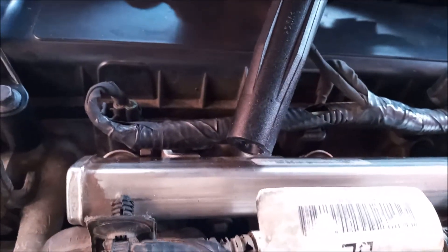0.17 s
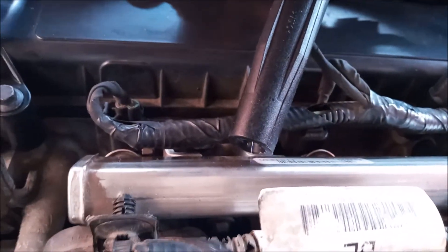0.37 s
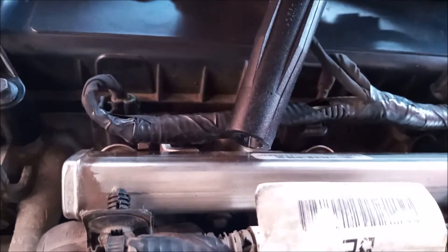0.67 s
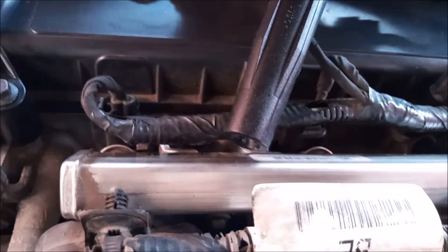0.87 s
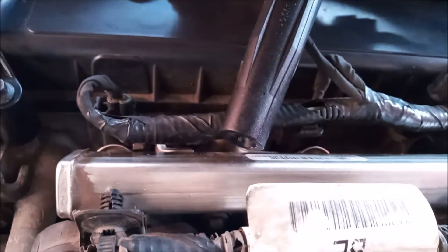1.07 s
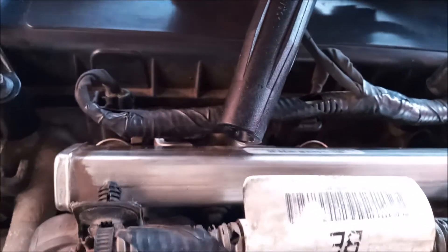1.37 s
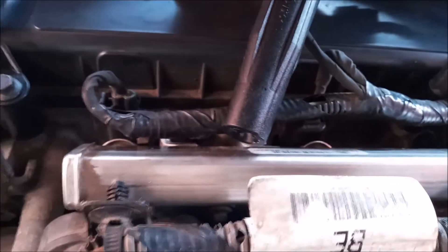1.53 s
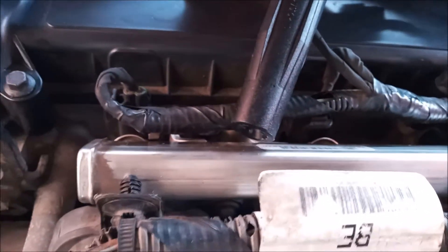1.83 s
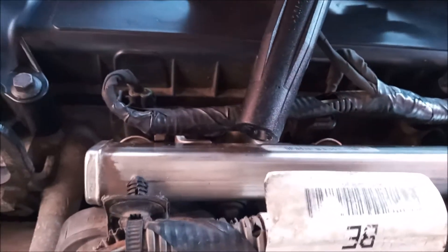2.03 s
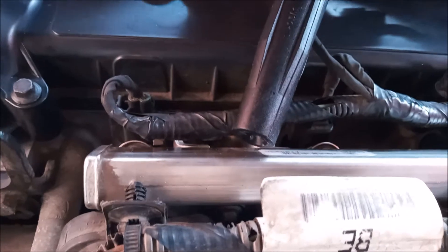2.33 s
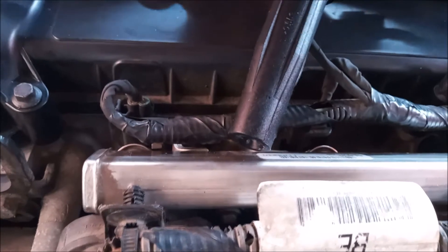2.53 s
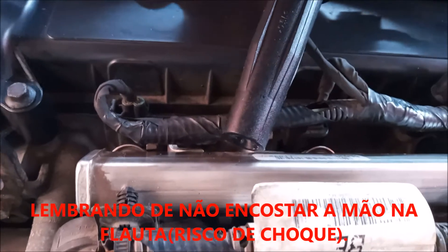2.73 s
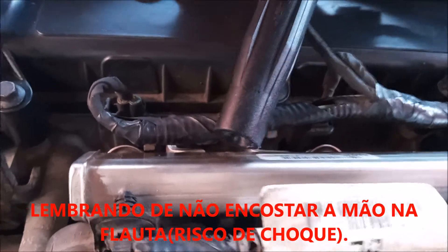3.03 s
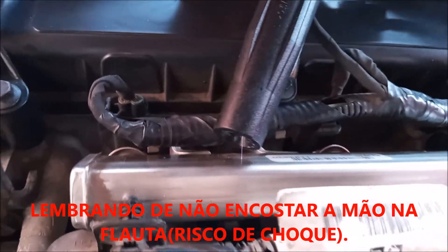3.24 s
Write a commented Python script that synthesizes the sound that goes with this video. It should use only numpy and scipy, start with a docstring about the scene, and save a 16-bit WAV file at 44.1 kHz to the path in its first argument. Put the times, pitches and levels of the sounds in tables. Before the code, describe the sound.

A loose ignition coil fires bright, dry snaps at an even fast pace throughout; between them the idling engine's noisy rush and valve clatter swell back in a close engine bay.

```python
"""An engine bay: a loose ignition coil fires one spark per engine cycle onto a metal rail, close to a small
microphone. Each spark is a noise sizzle, a decaying sine pop and ringing rail modes. Under it the engine idles:
shaped noise roar, sine whine and hums, block modes struck by clatter and valve knocks, and injector ticks.
A look-ahead limiter pulls everything down just before each spark and lets go after it."""
import sys
import numpy as np
from scipy import signal
from scipy.io import wavfile
from scipy.ndimage import uniform_filter1d, minimum_filter1d

SR = 44100
rng = np.random.default_rng(int(sys.argv[2]) if len(sys.argv) > 2 else 0)


def wrap_up_sound(samples):
    """Save the sound to the file named by the first command line argument, as 16-bit audio."""
    columns = np.atleast_2d(samples).T
    # keep every value between -1 and 1, then stretch to whole-number steps
    tamed = np.clip(columns, -1, 1)
    steps = np.round(tamed * 32767).astype(np.int16)
    wavfile.write(sys.argv[1], SR, steps)


N = 149940  # length in samples

# Spectrum of the engine, belt and fan roar. Each row: frequency in Hz, relative density in dB per Hz.
ROAR_SPECTRUM = [(24, -61), (40, -31), (553, -12.5), (747, -15), (1140, -11.5), (1620, -8.5), (1880, -9),
                 (3440, -3.5), (3800, -6.5), (4200, -4), (5670, -7.5), (6580, -11.5), (7280, -20.5),
                 (10900, -16), (15800, -20)]
# Alternator whine. Each row: multiple of WHINE_HZ, nominal rms level in dB.
WHINE_PARTIALS = [(1, -64), (2, -60), (3, -50.5), (3.5, -56), (4, -58), (8, -47)]
# Steady hums. Each row: frequency in Hz, nominal rms level in dB.
HUM_TONES = [(749, -51.5), (807.5, -49.5), (1212, -61.5)]
# Modes of the engine block. Each row: frequency in Hz, relative level in dB, t60 in seconds.
BLOCK_MODES = [(554.4, -11.5, 0.053), (804, -14.5, 0.062), (1580, -10, 0.038), (2490, -6, 0.045),
               (2773, -3.5, .04), (3034, -2.5, 0.036), (3384, 2, 0.018), (4108, 1.5, 0.038),
               (4515, -9.5, 0.063), (4890, -13.5, 0.017), (5108, -2.5, 0.052), (5765, -5, 0.065),
               (6390, -14, 0.047)]
# Valve knocks. Each row: delay after the spark in seconds, mean level in dB, spread in seconds.
VALVE_KNOCKS = [(.018, -40.5, 0.0067), (.042, -33.5, .003), (.055, -32, .005), (0.0917, -26.5, .0015),
                (.124, -27.5, .005)]
# Injectors. Each row: delay after the spark in seconds, click level before its high-pass in dB,
# mean lower ring level in dB, mean upper ring level in dB, rattle time in seconds.
INJECTOR_TICKS = [(.0380, -20.5, -37.5, -40, 0.0028), (.0790, -31, -41.5, -25.5, 0.0022),
                  (.1160, -19, -39, -34, 0.0049)]
# Lower and upper injector modes. Each row: frequency in Hz, relative level in dB, t60 in seconds.
LOW_MODES = [(10540, -1.5, 0.0091), (11040, -2, 0.014), (12000, 0, .015)]
HIGH_MODES = [(14800, -2, .015), (14950, 15, 0.013), (15610, 13, 0.018)]
# Sparks. Each row: start in seconds, then rail ring, pop and sizzle peak levels in dB before the limiter.
SPARK_EVENTS = [(0.0363, -2, -23, -4), (0.186, -2, -23.5, -7), (0.3371, -3, -21, -5),
                (0.4882, -2.5, -15, -5), (0.6386, -5, -20, -6), (0.7895, -1, -17, -2),
                (0.9387, -3.5, -25, -3), (1.0902, -2, -23, -4), (1.2411, -5.5, -19, -13),
                (1.3902, 0, -12, -6), (1.5411, -6.5, -10, -8.5), (1.6916, -2, -19, -7),
                (1.8421, -3.5, -22, -9), (1.9921, -0.5, -14, -8), (2.1428, -6, -16.5, -10),
                (2.2936, -4, -12, -10.5), (2.443, -0.5, -10, -5), (2.5944, -7.5, -12, -8),
                (2.7456, -1.5, -12, -6), (2.898, -1, -19.5, -7), (3.05, -5.5, -20.5, -11),
                (3.2018, -7.5, -15, -9.5), (3.3536, -2.5, -17, -5.5)]
# Modes coloring the sizzle, then modes of the rail. Each row: frequency in Hz, relative level in dB, t60 in seconds.
SIZZLE_MODES = [(10060, -7, .004), (12300, -4.5, 0.0061), (13560, -4.5, .005), (14800, -4, 0.0069),
                (15400, -6, 0.011)]
RAIL_MODES = [(2850, -5, 0.0065), (3940, -3.5, 0.0071), (4800, -1, 0.012), (5640, -3, 0.0068),
              (6410, -4.5, 0.0089), (7680, -7.5, 0.0072), (8220, -8, 0.0094)]
# Echoes off the engine bay. Each row: delay in seconds, level in dB re the direct sound.
BAY_ECHOES = [(.0007, 13.5), (.0018, -15.5), (.0034, -13), (.0060, -3)]
# Scattered tail of the engine bay. Its one row: t60 in seconds, initial level in dB re the direct sound.
BAY_TAIL = (0.034, -6.5)

CYCLE_S = .1507  # places the cycle that began before the first spark
ROAR_DB, PATCH_DB, FLICKER_DB = -28, 2, 2  # overall rms; rms of the two level variations
WHINE_HZ = 685.5
CLATTER_DB, CLATTER_PER_S, CLATTER_SPREAD_DB = -31.5, 2500, 1.5
KNOCK_VARY_DB, TICK_VARY_DB, JITTER_S = 4.5, 3, .0006  # standard deviations
SIZZLE_S = 0.00057  # rise and decay time of the sizzle noise
POP_HZ, POP_DECAY_S, POP_DELAY_S = 1000, 0.00041, 0.00078
RING_DELAY_S, CRACKLE_DECAY_S, CRACKLE = .0012, 0.00022, 0.4  # CRACKLE: noise added to a unit impulse
GAIN_DB, LIMIT_DB, DUCK_DB = 5, -16.5, 10  # make-up gain, threshold, greatest reduction
LOOK_S, HOLD_S, SMOOTH_S, RECOVER_S = 0.0044, 0.02, 0.021, 0.0069
ROLL_HZ, EDGE_HZ = 15800, 16800  # low-pass of the idling engine, band limit of the whole


def amp(db):
    """A level in decibels is the logarithm of an amplitude ratio."""
    return 10 ** (np.asarray(db) / 20)


def unit(x):
    """Division by the root mean square gives rms 1."""
    return x / np.sqrt(np.mean(x ** 2) + 1e-20)


def peaked(x):
    """Division by the greatest magnitude gives peak 1."""
    return x / abs(x).max()


def read(points, hz):
    """Interpolation of a spectrum along a logarithmic frequency axis."""
    f, value = np.transpose(points)
    return np.interp(np.log(hz + 1), np.log(f + 1), value)


def add(mix, s, sound):
    """Superposition: sounds add linearly; one that would start before time zero is left out."""
    i = round(s * SR)
    if i >= 0:
        part = mix[i:][:len(sound)]
        part += sound[:len(part)]


def ring(modes):
    """Modal superposition: an impulse response of decaying sines, scaled to energy 1."""
    t = np.arange(4096) / SR
    x = np.zeros(len(t))
    for k, (hz, db, t60) in enumerate(modes):
        decay = amp(db - 60 * t / t60) / np.sqrt(t60)
        x += (-1) ** k * decay * np.sin(2 * np.pi * hz * t)
    return x / np.linalg.norm(x)


def burst(noise, length_s):
    """A rattle as enveloped noise: quick rise, exponential fall, energy of 10 ms at rms 1."""
    u = np.arange(len(noise)) / SR / length_s
    x = noise * u * np.exp(-u)
    return x / np.linalg.norm(x) * np.sqrt(SR / 100)


def cycles():
    """Periodicity: spark times start the cycles, with one already under way at time zero."""
    return [SPARK_EVENTS[0][0] - CYCLE_S] + [row[0] for row in SPARK_EVENTS]


def roar():
    """Broadband engine, belt and fan noise: a shaped random spectrum with drifting patches and a shared flicker."""
    frames, hz = N // 128 + 5, np.fft.rfftfreq(512, 1 / SR)
    real, imaginary, patch = rng.standard_normal((frames, 257, 3)).T
    patch = uniform_filter1d(patch, size=8, axis=0)  # smooth over frequency
    patch = unit(uniform_filter1d(patch, size=10, axis=1))  # smooth over time
    flicker = unit(uniform_filter1d(rng.standard_normal(frames), size=3))
    level_db = read(ROAR_SPECTRUM, hz)[:, None] + PATCH_DB * patch + FLICKER_DB * flicker
    spectrum = (real + 1j * imaginary) * amp(level_db)
    noise = signal.istft(spectrum, nperseg=512, noverlap=384)[1][:N]
    return amp(ROAR_DB) * unit(noise)


def tones():
    """Alternator whine and steady hums: sines with slight amplitude and phase modulation."""
    t, out = np.arange(N) / SR, np.zeros(N)
    whine = [(multiple * WHINE_HZ, db) for multiple, db in WHINE_PARTIALS]
    for hz, db in whine + HUM_TONES:
        waver = unit(uniform_filter1d(rng.standard_normal(N), size=4000))
        level = amp(db + 3.0 * waver) * np.sqrt(2)  # 3 dB rms waver
        phase = 2 * np.pi * hz * (t + .00008 * waver) + 6 * rng.random()
        out += level * np.sin(phase)
    return out


def block():
    """Modal excitation: dense small taps and timed valve knocks ring the engine block."""
    size_db = CLATTER_SPREAD_DB * np.minimum(rng.exponential(1, N), 5)
    taps = amp(size_db) * rng.choice([-1, 1], N) * (rng.random(N) < CLATTER_PER_S / SR)
    drive = amp(CLATTER_DB) * unit(taps)
    for start in cycles():
        for delay, db, spread_s in VALVE_KNOCKS:
            noise, vary = rng.standard_normal(1500), rng.standard_normal(2)
            s = start + delay - spread_s + JITTER_S * vary[0]  # the envelope crests near the delay
            add(drive, s, amp(db + KNOCK_VARY_DB * vary[1]) * burst(noise, spread_s))
    return signal.oaconvolve(drive, ring(BLOCK_MODES))[:N]


def injectors():
    """Impact and resonance: each injector clicks at its place in the cycle and rattles two groups of modes."""
    click, low, high = np.zeros((3, N))
    for start in cycles():
        for delay, click_db, low_db, high_db, rattle_s in INJECTOR_TICKS:
            noise, vary = rng.standard_normal((3, 1000)), rng.standard_normal(3)
            s = start + delay + JITTER_S * vary[0]
            add(click, s, amp(click_db) * noise[0, :100] * np.exp(-np.arange(100) / 25))
            add(low, s, amp(low_db + TICK_VARY_DB * vary[1]) * burst(noise[1], rattle_s))
            add(high, s, amp(high_db + TICK_VARY_DB * vary[2]) * burst(noise[2], rattle_s))
    click = signal.lfilter(*signal.butter(2, 7500, "high", fs=SR), click)
    low_ring = signal.oaconvolve(low, ring(LOW_MODES))[:N]
    high_ring = signal.oaconvolve(high, ring(HIGH_MODES))[:N]
    return click + low_ring + high_ring


def engine_bay():
    """Reflection: direct sound, distinct echoes and a sparse, exponentially decaying scattered tail."""
    t = np.arange(1500) / SR
    t60, tail_db = BAY_TAIL
    scatter = rng.standard_normal(len(t)) * (rng.random(len(t)) < .1)
    bay = amp(tail_db - 60 * t / t60) * scatter
    bay[0] = 1  # direct sound
    for s, db in BAY_ECHOES:
        bay[round(s * SR)] += amp(db)
    return bay


def sparks():
    """Discharge and impulse response: a sizzle, a low pop, then the rail; the bay echoes sizzle and rail."""
    t, out = np.arange(1500) / SR, np.zeros(N)
    bay = engine_bay()
    fizz = signal.fftconvolve(ring(SIZZLE_MODES), bay)[:3000]
    rail = signal.fftconvolve(ring(RAIL_MODES), bay)[:3000]
    pop = peaked(np.sin(2 * np.pi * POP_HZ * t) * np.exp(-t / POP_DECAY_S))
    for s, ring_db, pop_db, sizzle_db in SPARK_EVENTS:
        arc, blow = rng.standard_normal((2, 200))
        blow = CRACKLE * blow * np.exp(-t[:200] / CRACKLE_DECAY_S)
        blow[0] += 1  # the impulse that strikes the rail
        sizzle = peaked(signal.fftconvolve(burst(arc, SIZZLE_S), fizz))
        rail_ring = peaked(signal.fftconvolve(blow, rail))
        add(out, s, amp(sizzle_db) * sizzle)
        add(out, s + POP_DELAY_S, amp(pop_db) * pop)
        add(out, s + RING_DELAY_S, amp(ring_db) * rail_ring)
    return out


def scene():
    """Superposition of the low-passed idling engine and the full-band sparks."""
    engine = roar() + tones() + block() + injectors()
    low_pass = signal.firwin(301, ROLL_HZ, window=("kaiser", 7), fs=SR)
    engine = signal.oaconvolve(engine, low_pass, "same")
    return (engine + sparks())[None]


def record(dry):
    """Dynamic range limiting: gain falls ahead of peaks, holds and recovers; then low cut and band limit."""
    power = uniform_filter1d(dry[0] ** 2, size=60)
    level_db = 10 * np.log10(abs(power) + 1e-12)
    duck_db = DUCK_DB * np.tanh(np.maximum(level_db - LIMIT_DB, 0) / 3)
    look, hold, smooth = round(LOOK_S * SR), round(HOLD_S * SR), round(SMOOTH_S * SR)
    span = look + hold
    # running maximum from the hold time behind to the look-ahead time in front
    held_db = -minimum_filter1d(-np.pad(duck_db, span), size=span)
    held_db = held_db[span + span // 2 - hold:][:N]
    r = np.exp(-1 / (RECOVER_S * SR))
    recovering_db = signal.lfilter([1 - r], [1, -r], held_db)
    held_db = np.maximum(held_db, recovering_db)
    x = dry * amp(GAIN_DB - uniform_filter1d(held_db, size=smooth))
    x = signal.lfilter(*signal.butter(3, 170, "high", fs=SR), x)
    band_limit = signal.firwin(511, EDGE_HZ, window=("kaiser", 9), fs=SR)
    return signal.oaconvolve(x, band_limit[None], "same")


dry = scene()
out = record(dry)
wrap_up_sound(out)
```